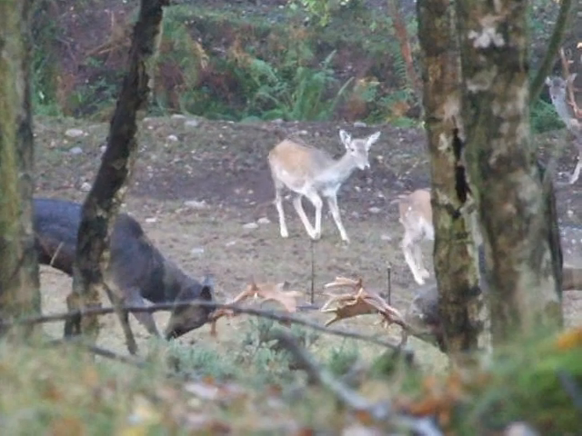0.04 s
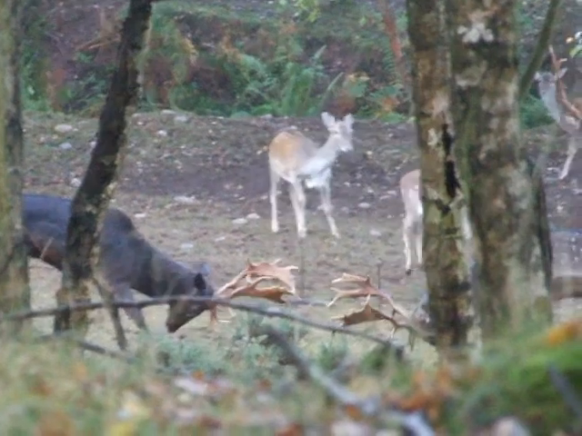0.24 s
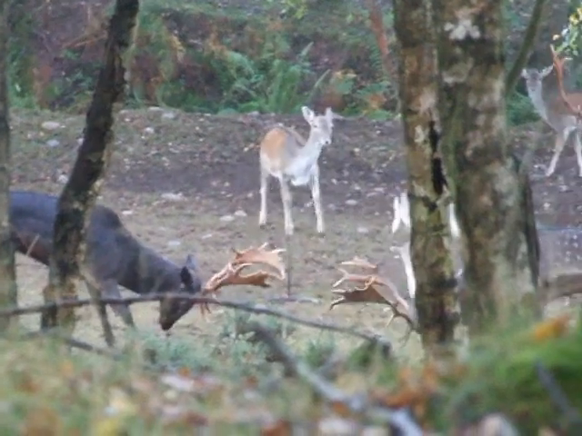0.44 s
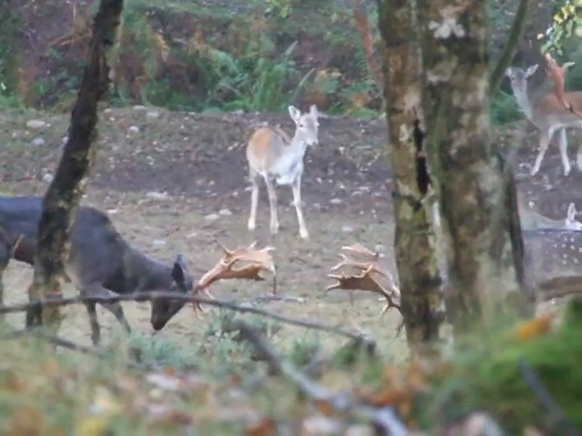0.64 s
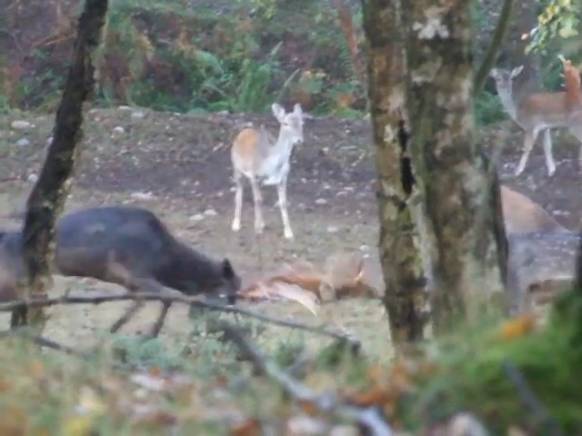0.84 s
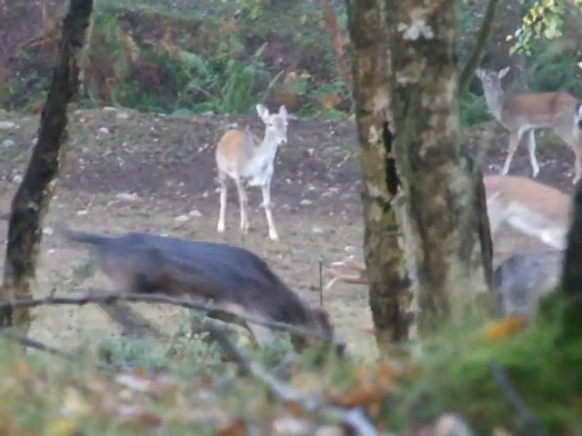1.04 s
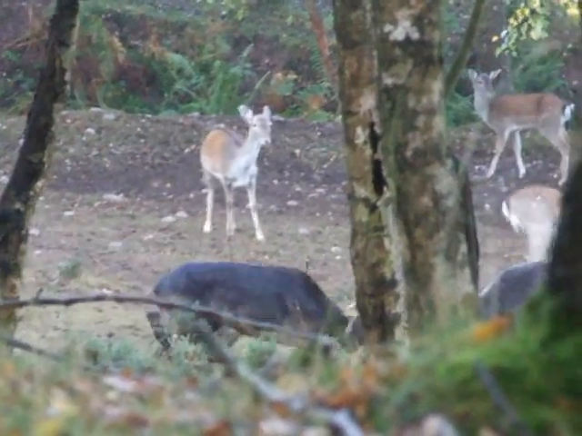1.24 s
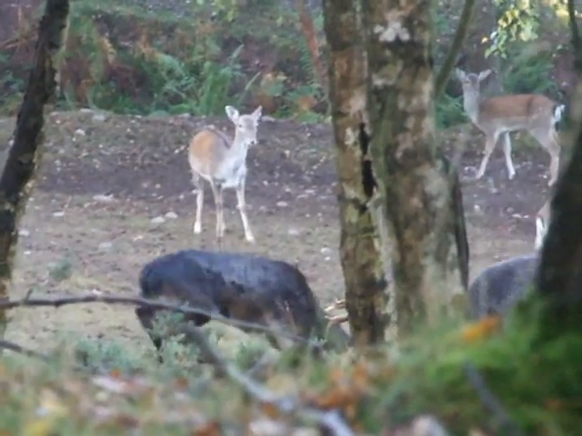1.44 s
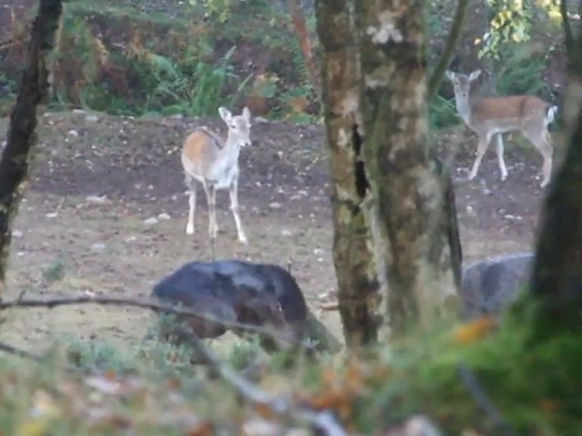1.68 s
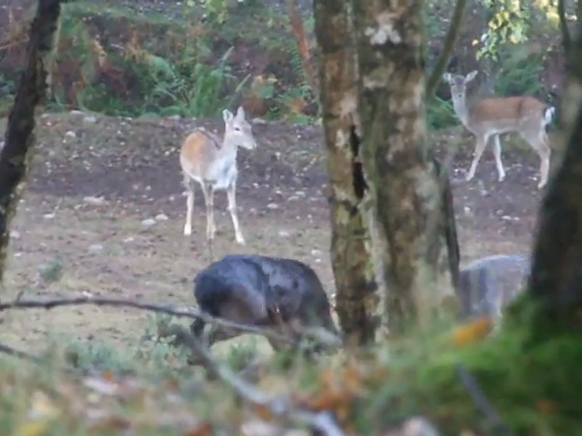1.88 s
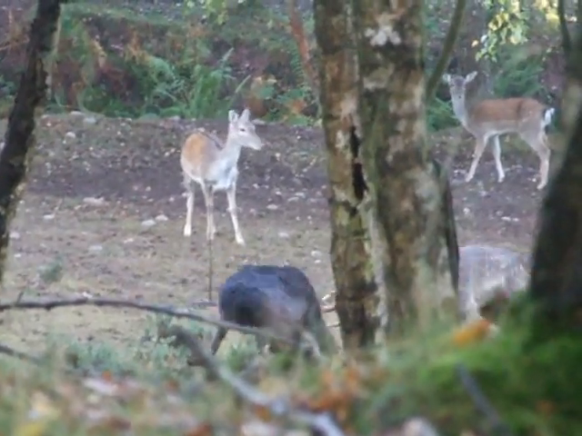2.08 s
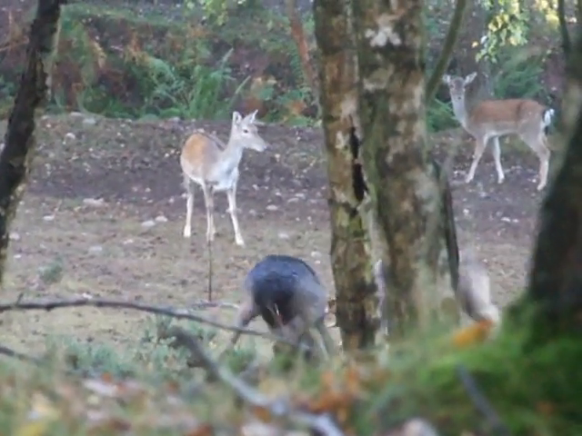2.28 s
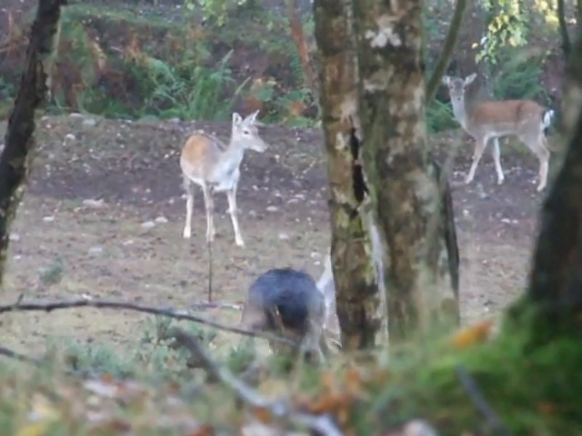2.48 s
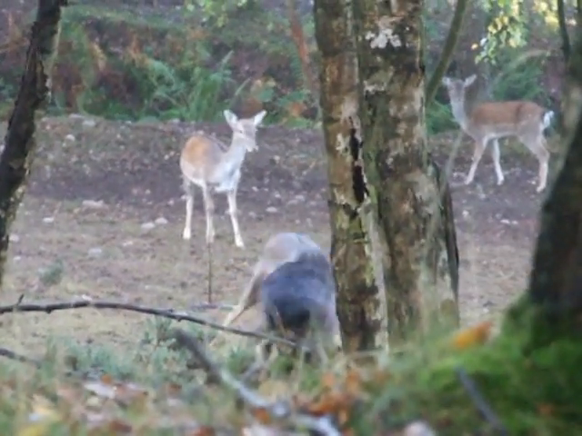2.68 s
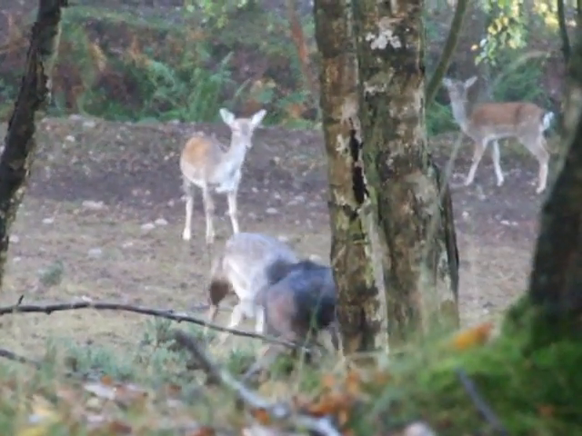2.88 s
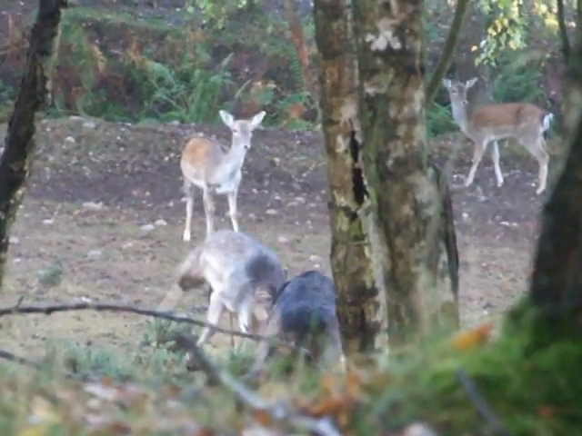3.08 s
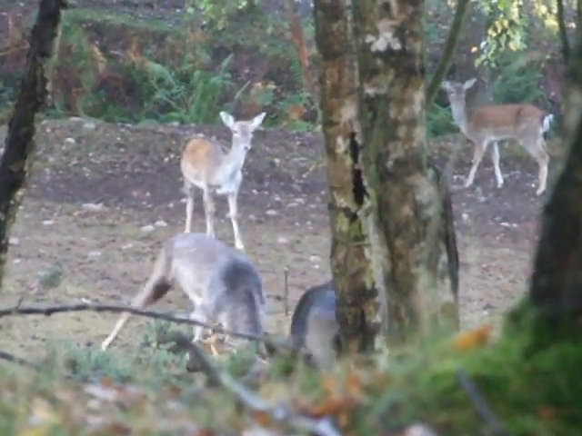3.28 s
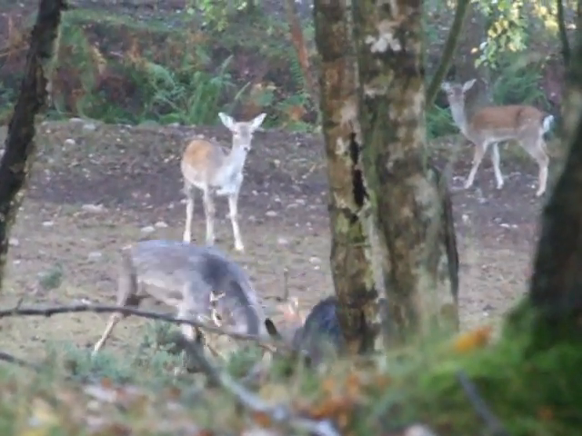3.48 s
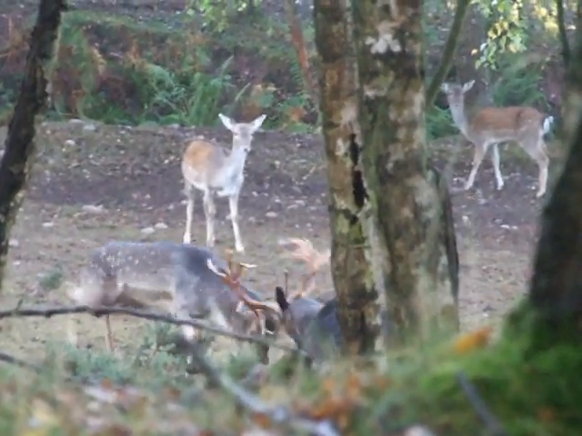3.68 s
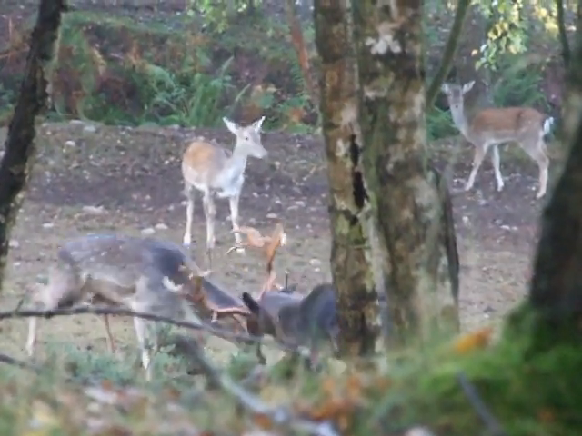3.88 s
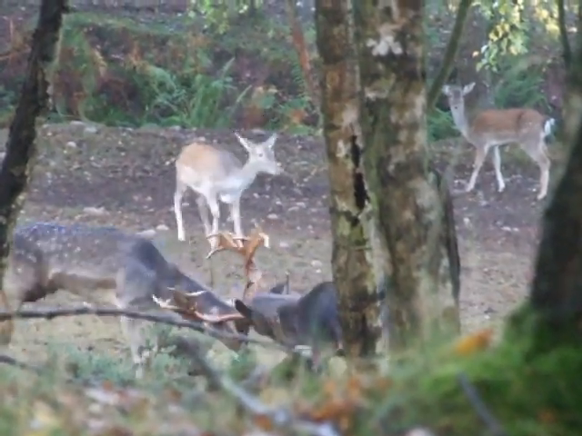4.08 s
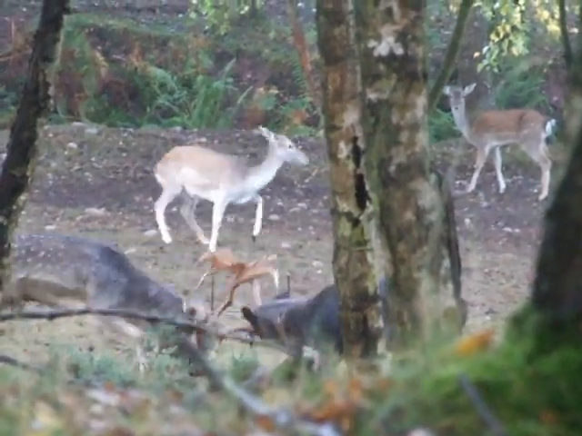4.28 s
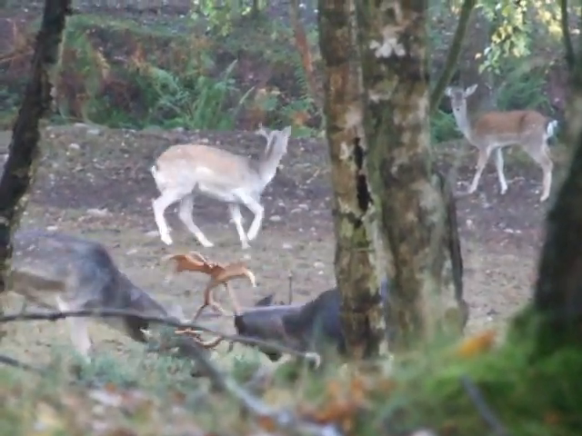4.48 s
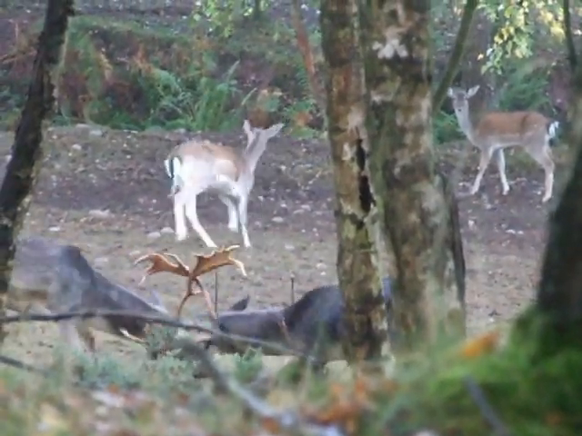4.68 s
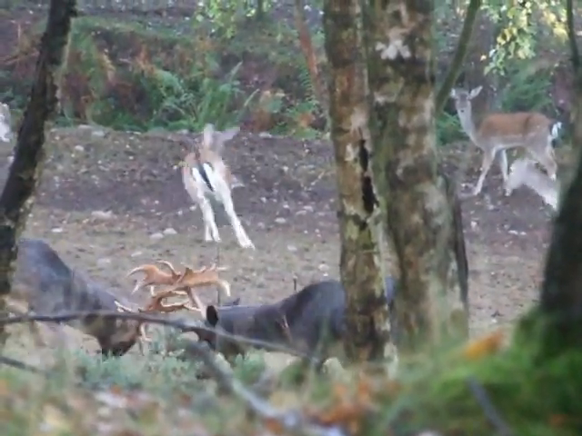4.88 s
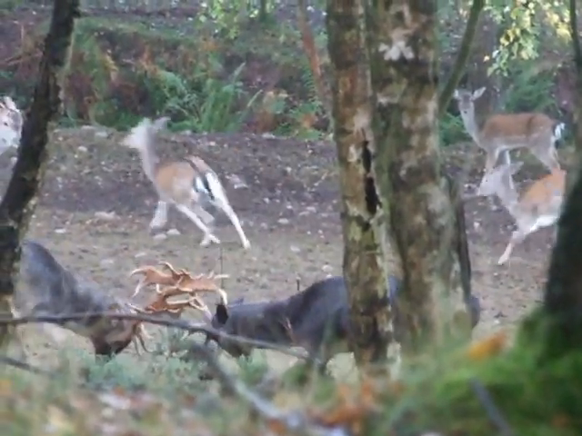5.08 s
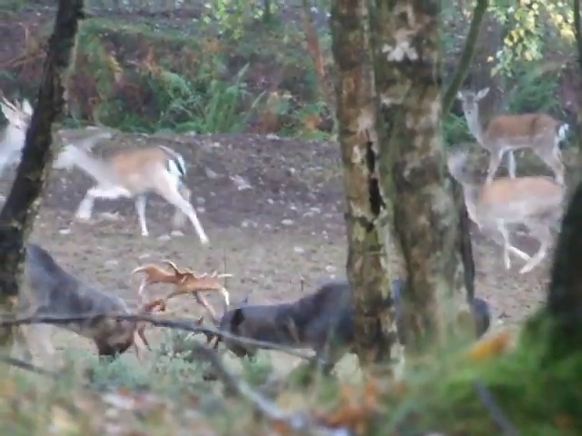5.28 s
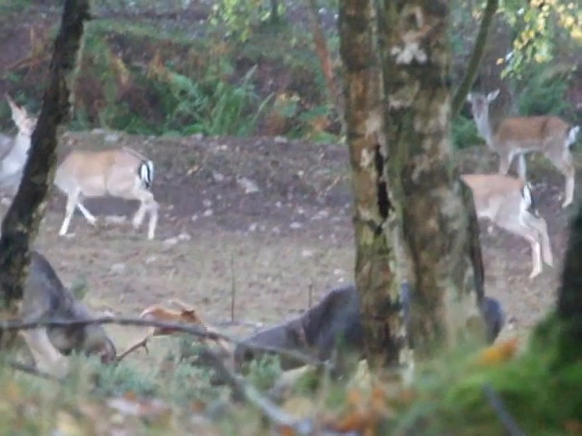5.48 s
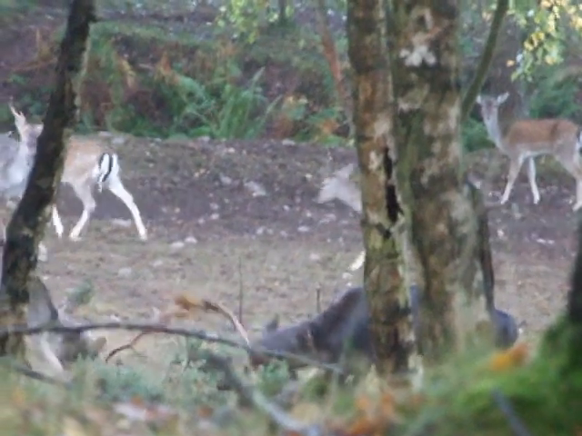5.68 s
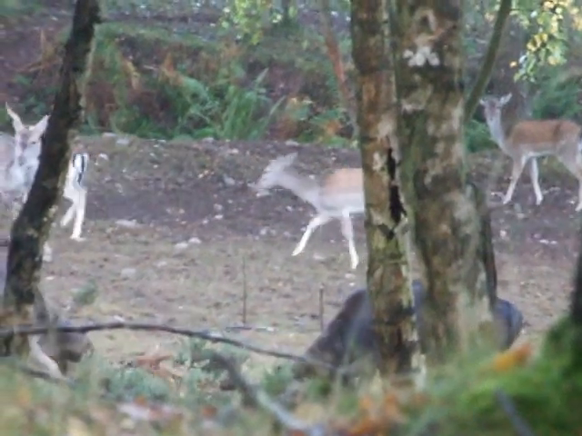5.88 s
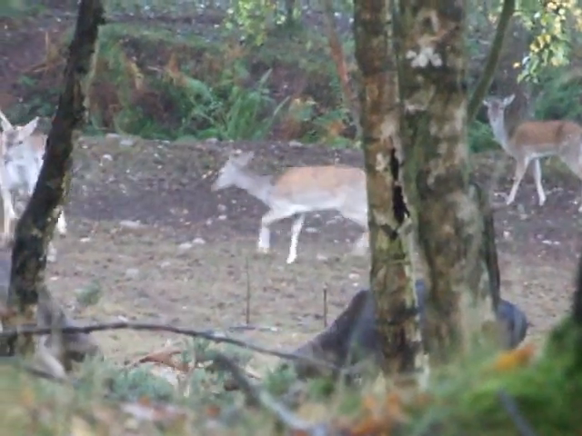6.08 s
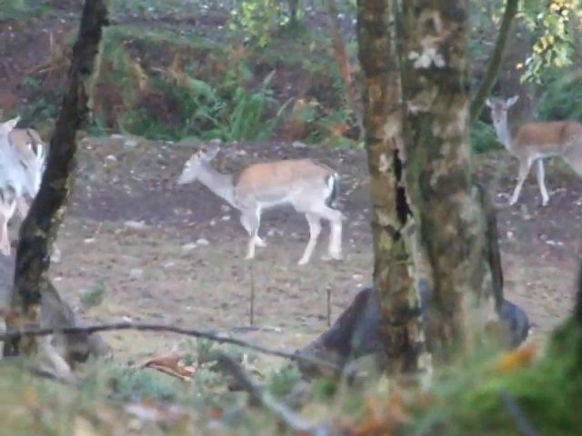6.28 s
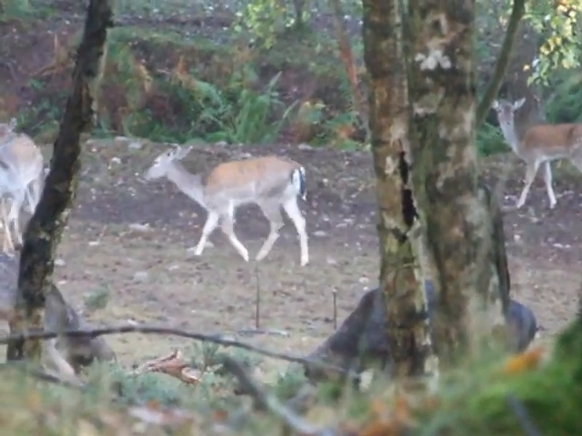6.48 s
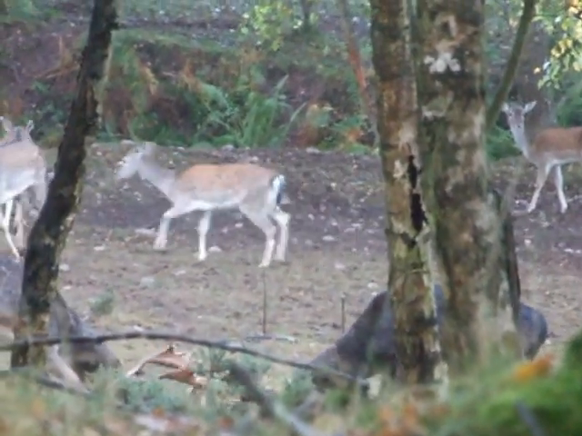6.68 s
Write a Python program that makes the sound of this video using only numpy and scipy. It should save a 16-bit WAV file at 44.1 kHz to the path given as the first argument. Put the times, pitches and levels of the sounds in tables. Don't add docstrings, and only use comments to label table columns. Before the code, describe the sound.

At a wood's edge, fighting bucks clash antlers: one hard knock, then a dense clatter around one second, scattered clacks, another burst past three seconds and the sharpest cracks near the end. Low, snoring, pulsed groans come between and beneath the blows, with a few dull thuds. Short echoes scatter off the trunks over faint leaf hiss and far rumble, with a mono microphone some distance away.

```python
import sys
import numpy as np
from scipy import signal
from scipy.fft import rfft, irfft, next_fast_len
from scipy.io import wavfile
from scipy.ndimage import map_coordinates

SR = 44100
rng = np.random.default_rng(int(sys.argv[2]) if len(sys.argv) > 2 else 0)


def voltage_ratio(level):
    return 10 ** (np.asarray(level, float) / 20)


def to_wav(sig):
    pcm = np.clip(np.atleast_2d(sig), -1, 1) * 32767
    pcm = np.round(pcm).astype(np.int16)
    wavfile.write(sys.argv[1], SR, pcm.T)


N = 297234

# time_s, level_db
BACKGROUND_LEVEL = [(0.0, 2), (.25, 0), (.5, -1), (0.9, -1), (1.3, 5), (2.1, 0.3), (2.35, -1), (2.6, 2), (3.1, .5),
                    (3.7, 1), (3.9, -0.4), (4.2, -1), (4.5, 3), (4.95, -1.5), (5.8, 4.5), (6.2, -2.5), (6.4, 2),
                    (6.74, 0.5)]
# freq_hz, density_db_per_hz
RUMBLE_SPECTRUM = [(12, -57.5), (20, -28), (34, -7), (80, -3.5), (151, -7), (248, -7.5), (344, -11),
                   (527, -9.5), (594, -8.5), (659, -8), (1200, -12.5), (1560, -53), (2640, -120)]
# freq_hz, density_db_per_hz
LEAF_SPECTRUM = [(590, -59.5), (1000, -7.5), (1310, -2), (1820, -4), (2670, -5.5), (3400, -7.5),
                 (4040, -5.5), (5000, -5.5), (7150, -8), (9000, -16.5), (11700, -67), (19800, -120)]
RUMBLE_DB, LEAVES_DB, SWAY_DB = -49.5, -48, 0.8
RUMBLE_FOLLOWS = 0.35

# start_s, length_s,
# pitch_hz, level_db
RASPS_AND_WHINES = [
    (.15, .35, 4420, -52),
    (0.551, 0.17, 4570, -54),
    (.68, 0.25, 4540, -49.5),
    (2.9, .44, 4580, -53),
    (5.44, 0.39, 4540, -47),
    (.81, 0.14, 1770, -50),
    (.93, 0.1, 2050, -53),
    (3.37, .17, 1830, -51),
    (5.8, 0.23, 1990, -48),
]
RASP_EDGE_S, SAG_HZ_PER_S, FADE_DB_PER_S = 0.068, 199, 15

# freq_hz, t60_s
WOOD_DECAY = [(200, 0.2), (1000, 0.43), (2500, 0.63), (5500, 0.56), (9000, 0.47)]
DIRECT_LAG_S = 0.0008

# freq_hz, level_db
TINE_MODES = [(3700, -4), (4300, -2.5), (4900, -0.5), (5500, 1), (6100, 3), (6800, 0), (7500, -4),
              (8300, -4), (9200, -10)]
# freq_hz, level_db
PALM_MODES = [(1400, -5), (1900, 0), (2400, 3), (2800, 2.5), (3200, -16)]
# time_s, peak_db, loudest_mode_hz, wood_answer_db
CLICKS = [(0.6904, -42, 4570, 3), (1.0332, -22, 7400, 10.5), (1.0772, -14.5, 6500, 9.5),
          (2.4311, -19, 7470, -4), (2.4526, -22.5, 4300, -10), (2.4895, -26, 4000, 11.5),
          (3.3584, -11.5, 6000, -7), (3.361, -21.5, 2250, 15.5), (3.374, -15, 5270, -2),
          (3.3939, -24.5, 1960, 16.5), (3.5805, -22, 4600, -16), (3.7551, -20, 6200, 9),
          (4.0053, -24, 4920, 5.5), (4.2703, -24.5, 4970, -10), (4.46, -26, 5330, 2.5),
          (5.4014, -9.5, 5800, -21), (5.7443, -29, 5090, 15), (5.8058, -6, 6440, 0),
          (6.2365, -14.5, 5960, 4.5), (6.4053, -16.5, 6100, -18), (5.4023, -9.5, 7600, -3)]
# time_s, peak_db, loudest_mode_hz, wood_answer_db
RATTLES = [(0.995, -34, 3130, -19), (1.1214, -15, 5180, 6.5), (1.4774, -27, 1910, 0),
           (2.6259, -22.5, 2830, 9), (3.199, -35, 4460, -20), (3.323, -29, 3600, 12.5),
           (3.3512, -24, 5500, 7), (4.7276, -33.5, 5950, 7), (5.4038, -22, 5450, 9.5),
           (5.5419, -31.5, 4470, 5.5), (5.7668, -26, 5000, -1), (5.8204, -22, 6800, 7.5),
           (4.2552, -21, 3280, -1.5), (6.079, -35, 4140, -8), (6.1443, -36, 4200, -15),
           (6.1764, -34, 4470, -17), (6.3636, -27, 5350, 6.5), (6.503, -35, 4300, -11),
           (6.645, -33, 3550, -11), (6.708, -33.5, 4200, -14)]
# time_s, peak_db, loudest_mode_hz, wood_answer_db
SMACKS = [(0.2792, -20, 2620, 10), (1.0097, -25.5, 4480, 5), (1.0649, -28.5, 2240, 15),
          (1.1114, -18.5, 2510, -16), (1.1268, -25, 5800, 4.5), (1.5803, -21, 2300, 0.5),
          (1.7857, -18.5, 2450, 8.5), (2.6818, -29, 2200, -20), (3.1564, -31, 1970, -20),
          (4.2493, -32, 2750, -6), (4.75, -25.5, 2590, -0.5), (5.6294, -23, 2760, 5),
          (5.8765, -34.5, 2000, 16.5), (6.109, -36, 2534, -13), (6.535, -33.5, 2600, -11)]
# time_s, peak_db, loudest_mode_hz, wood_answer_db
KNOCKS = [(0.9636, -41, 2020, 7), (1.077, -29, 2540, -8), (1.0983, -20, 2160, 10), (1.3446, -24, 1730, -18),
          (1.9992, -36, 2730, 10), (2.3106, -36.5, 2880, 8), (2.8738, -36, 1660, -3),
          (3.1355, -36.5, 1820, 12.5), (3.279, -36.5, 1940, 4), (3.311, -37, 1490, 13),
          (3.3788, -21.5, 2440, -2), (4.2548, -28, 1560, 9.5), (5.909, -36, 2240, -2)]
# palm_db, tines_db
RACK_REACH = [
    (-24, -14),
    (-8, -6.5),
    (-9.5, 0),
    (-9, -7.5),
]

# time_s, peak_db, pitch_hz
THUDS = [(0.416, -38, 296), (1.104, -38, 362), (1.128, -49, 355), (1.62, -37, 400), (1.69, -34.5, 420),
         (1.789, -31, 273), (2.327, -43, 333), (3.327, -34, 333), (3.377, -34, 370), (5.411, -47, 197)]

# first_closure_s, last_closure_s, fold_cycles, early_drag_ms
GROANS = [
    (0.811, 1.066, 8, 0),
    (1.306, 1.53, 7, 9),
    (2.417, 2.714, 10, 18),
    (3.55, 3.653, 3, 0),
    (3.722, 4.079, 12, 0),
    (4.318, 4.606, 8, 0),
    (4.955, 5.35, 13, 15),
    (5.606, 6.095, 16, 0),
    (6.278, 6.719, 17, 0),
]
# chest_start_hz, chest_end_hz, throat_hz, lips_hz
TRACTS = [(222, 200, 840, 2600), (204, 248, 1153, 1850), (215, 247, 1153, 1950), (189, 246, 1300, 1800),
          (172, 196, 1173, 2100), (190, 259, 1400, 2700), (211, 266, 1165, 2010), (205, 246, 1148, 1960),
          (224, 233, 1090, 4900)]
# peak_db, swell_db (start to end), brightness_db, throat_db, wood_answer_db
EFFORTS = [(-39, -13.5, -3.5, -10, -4), (-32.5, 5.5, -3, -2.5, -5.5), (-33, 2.5, -3.5, 1, -3),
           (-32, 11, -23, -11, -22), (-47.5, -9.5, -4, 2.5, 10), (-32.5, -3.5, -7, 1.5, -1.5),
           (-36, 5, -4.5, 1, -3), (-38.5, 0, 0, -5, -2), (-37.5, 0.5, -5, 3, -2)]
# chest_multiple, t60_s, level_db
CHEST_MODES = [(.68, 0.12, -14.5), (1.001, 0.038, 1.5), (1.749, 0.037, -5), (2.7, 0.073, -13.5)]
# throat_multiple, t60_s, level_db
MOUTH_MODES = [(1.002, 0.059, -2.5), (1.269, 0.0073, -2.5), (1.55, 0.019, -10.5), (1.9, 0.028, -2),
               (2.199, 0.024, -1.5), (2.55, 0.019, -5.5), (3.1, 0.018, -10)]
# time_s, rise_db
SNAPS = [(0.876, 0), (1.345, 7.5), (1.38, 6.5), (1.411, 9.5), (1.464, 6), (1.497, 8.5), (2.488, 1),
         (2.553, 5.5), (2.582, 7), (2.656, 1.5), (2.683, 3.5), (5.085, 8), (5.154, 7.5), (5.207, 11),
         (5.238, 4), (5.295, 10.5), (5.911, 5.5), (6.013, 10.5), (6.038, 9.5), (6.33, 6.5), (6.408, -1)]
SNAP_REACH_S = 0.014
ATTACK_S, ATTACK_DB, RELEASE_S, RELEASE_DB = 0.036, 6, 0.034, 10.5
WEAK_DB, SCATTER_DB, JITTER_S = 0.5, 1.37, 0.002

# freq_hz, gain_db
CAMERA_BAND = [(7000, 0), (7600, 0), (8000, -1), (8500, -3), (9000, -4.5), (9700, -6.5), (10200, -17),
               (10600, -70.5), (11000, -75)]


def unit(x):
    return x / np.sqrt(np.mean(x ** 2, axis=-1, keepdims=True) + 1e-20)


def along(points, hz):
    f, v = np.transpose(points)
    return np.interp(np.log(hz + 1), np.log(f + 1), v)


def wobble(rate_hz):
    knots = rng.standard_normal(int(N * rate_hz / SR) + 4)
    return map_coordinates(knots, [np.arange(N) * rate_hz / SR])


def filtered(x, response):
    m = next_fast_len(len(x) + 8192)
    return irfft(rfft(x, m) * response(np.fft.rfftfreq(m, 1 / SR)), m)[:len(x)]


def add(track, time_s, x):
    part = track[round(time_s * SR):][:len(x)]
    part += x[:len(part)]


def ring(hz, db, t60_s, rise_s=0.000087, size=SR // 16):
    t = np.arange(size) / SR
    return voltage_ratio(db - 60 * t / t60_s) * np.sin(2 * np.pi * hz * t) * (1 - np.exp(-t / rise_s))


def wood(x, gap_s=0.0015, lumpy_db=2.0):
    size = int(0.6 * SR)
    lumps = voltage_ratio(lumpy_db * np.repeat(rng.standard_normal(size // 64 + 1), 64)[:size])
    lumps *= 1 + 0.5 * np.exp(-np.arange(size) / (0.0016 * SR))
    hz, t, z = signal.stft(lumps * rng.standard_normal(size), SR, nperseg=256)
    decay = voltage_ratio(-60 * t / along(WOOD_DECAY, hz)[:, None])
    tail = signal.istft(z * decay, SR, nperseg=256)[1]
    return signal.fftconvolve(np.pad(x, (int(gap_s * SR), 0)), tail / np.linalg.norm(tail))


def air():
    time_s, level_db = np.transpose(BACKGROUND_LEVEL)
    background_db = np.interp(np.arange(N) / SR, time_s, level_db)
    rumble = unit(filtered(rng.standard_normal(N), lambda f: voltage_ratio(along(RUMBLE_SPECTRUM, f))))
    leaves = unit(filtered(rng.standard_normal(N), lambda f: voltage_ratio(along(LEAF_SPECTRUM, f))))
    rumble *= voltage_ratio(RUMBLE_DB + RUMBLE_FOLLOWS * background_db + 0.1 * wobble(9.4))
    leaves *= voltage_ratio(LEAVES_DB + background_db + SWAY_DB * wobble(4.8))
    return rumble + leaves


def rasps_and_whines():
    track = np.zeros(N)
    smear = wobble(350) + 1j * wobble(350)
    for start_s, length_s, hz, db in RASPS_AND_WHINES:
        t = np.arange(int(length_s * SR)) / SR
        edges = np.clip(np.minimum(t, length_s - t) / RASP_EDGE_S, 0, 1)
        tone = np.exp(2j * np.pi * (hz - SAG_HZ_PER_S * t / 2) * t)
        rasp = np.real(smear[round(start_s * SR):][:len(t)] * tone)
        add(track, start_s, voltage_ratio(db - FADE_DB_PER_S * t) * edges * rasp)
    return voltage_ratio(2.4 * wobble(25)) * track


def rack_modes(hz, palm_db, tines_db):
    tines = [(f, db + tines_db + 11.5 - 5 * max(0, np.log2(f / hz))) for f, db in TINE_MODES]
    return tines + [(f, db + palm_db + 9.0) for f, db in PALM_MODES]


def hump(hz, db, width_hz):
    grid_hz = np.fft.rfftfreq(256, 1 / SR)
    return voltage_ratio(2 * db) / (1 + ((grid_hz - hz) / width_hz) ** 4)


def antlers():
    track = np.zeros(N)
    for rows, (palm_db, tines_db) in zip([CLICKS, RATTLES, SMACKS, KNOCKS], RACK_REACH):
        for time_s, db, hz, wet_db in rows:
            modes = rack_modes(hz, palm_db, tines_db)
            detune, strength, late = rng.standard_normal((3, len(modes)))
            late = (np.abs(late) * 0.0014 * SR).astype(int)
            others = 0
            power = hump(hz, 2.4, 530)
            for (f, level_db), d, g, k in zip(modes, detune, strength, late):
                mode = ring(f * (1 + 0.072 * d), level_db + 0.84 * g, 45 / f, size=1300)
                others = others + np.roll(mode, k)
                power = power + hump(f, level_db + 2.5 * g, 445)
            loudest = ring(hz, 0.84, 28 / hz, size=1300)
            add(track, time_s + DIRECT_LAG_S, voltage_ratio(db) * (loudest + voltage_ratio(-12.0) * others))
            blow = np.roll(irfft(np.sqrt(power)), 40)
            add(track, time_s, voltage_ratio(db + wet_db + 10.5) * wood(blow))
    return track


def thuds():
    track = np.zeros(N)
    for time_s, db, hz in THUDS:
        blow = ring(hz, db, 0.032, rise_s=0.00037)
        add(track, time_s, blow)
        add(track, time_s, voltage_ratio(1.0) * wood(blow))
    return track


def chest_ring(chest_hz):
    modes = []
    for multiple, t60_s, db in CHEST_MODES:
        d, g = rng.standard_normal(2)
        modes.append(ring(chest_hz * multiple * (1 + 0.065 * d), db + 2.9 * g, t60_s, rise_s=0.0021))
    return sum(modes)


def mouth_ring(throat_hz, lips_hz, throat_db, snapped):
    mouth = 0
    for j, (multiple, t60_s, db) in enumerate(MOUTH_MODES):
        d, g = rng.standard_normal(2)
        level_db = db + 1.5 * g + throat_db * (j == 0)
        mouth = mouth + (-1) ** j * ring(throat_hz * multiple * (1 + 0.012 * j * d), level_db, t60_s)
    d, g = rng.standard_normal(2)
    mouth = mouth + ring(lips_hz * (1 + 0.015 * d), 2.5 * g - 1.5, 0.022)
    mouth *= 1 + 0.5 * np.repeat(rng.standard_normal(len(mouth) // 40 + 1), 40)[:len(mouth)]
    if snapped:
        mouth += ring(1.075 * lips_hz, 3.9, 0.0064)
    return mouth


def groan(timing, effort, tract):
    start_s, end_s, cycles, drag_ms = timing
    db, swell_db, bright_db, throat_db, _ = effort
    chest_start_hz, chest_end_hz, throat_hz, lips_hz = tract
    length_s = end_s - start_s
    voice = np.zeros(int(length_s * SR) + SR // 8)
    for k in range(int(cycles) + 1):
        u, weak = k / cycles, k % 2
        jitter, scatter = rng.standard_normal(2)
        s = u * length_s + drag_ms / 1000 * np.sin(np.pi * u ** 0.75) ** 2
        edge_db = -ATTACK_DB * np.exp(-s / ATTACK_S) - RELEASE_DB * np.exp((s - length_s) / RELEASE_S)
        s = abs(s + JITTER_S * jitter)
        near = [(at_s - start_s, up) for at_s, up in SNAPS if abs(at_s - start_s - s) < SNAP_REACH_S]
        s, snap_db = near[0] if near else (s, 0)
        chest = chest_ring(chest_start_hz + (chest_end_hz - chest_start_hz) * min(1, 1.41 * u))
        mouth = mouth_ring(throat_hz, lips_hz, throat_db, snap_db > 0)
        mouth_db = bright_db + 0.46 * edge_db - 1.3 * weak + 0.55 * snap_db
        size_db = db + swell_db * (u - 0.5) + edge_db - WEAK_DB * weak
        size_db += 0.38 * snap_db + SCATTER_DB * scatter
        add(voice, s, -voltage_ratio(size_db) * (voltage_ratio(3.5) * chest + voltage_ratio(mouth_db) * mouth))
    return voice + voltage_ratio(-16.5) * np.roll(voice, int(0.0045 * SR))


def bucks():
    track = np.zeros(N)
    for timing, effort, tract in zip(GROANS, EFFORTS, TRACTS):
        voice = groan(timing, effort, tract)
        arrival_s, wet_db = timing[0] + DIRECT_LAG_S, effort[-1]
        add(track, arrival_s, voice)
        add(track, arrival_s, voltage_ratio(wet_db) * wood(voice, gap_s=0.012))
    return track


def scene():
    return (air() + rasps_and_whines() + antlers() + thuds() + bucks())[None]


def roll_off(x):
    return signal.sosfilt(signal.butter(12, 10380, fs=SR, output="sos"), x)


def record(dry):
    x = filtered(dry[0], lambda f: voltage_ratio(along(CAMERA_BAND, f)))
    top = filtered(x, lambda f: 1 / (1 + (7600 / (f + 1)) ** 24))
    x = x + top * (voltage_ratio(3 * wobble(320) - 1.5) - 1)
    x = x + voltage_ratio(-83.5) * rng.standard_normal(N) - 0.0035
    return roll_off(x[None])


dry = scene()
out = record(dry)
to_wav(out)
```